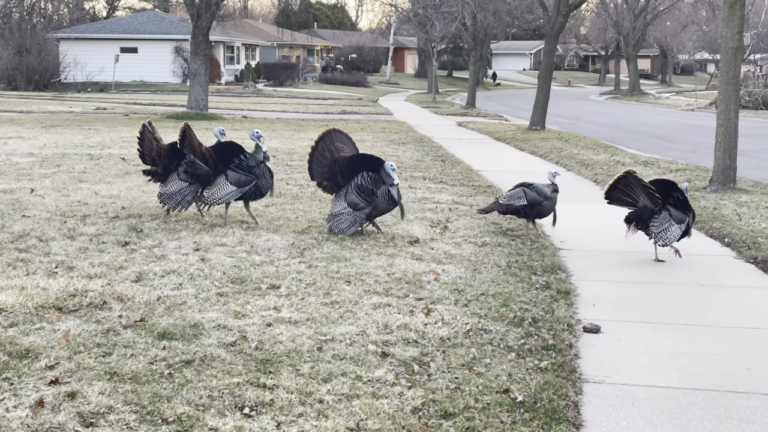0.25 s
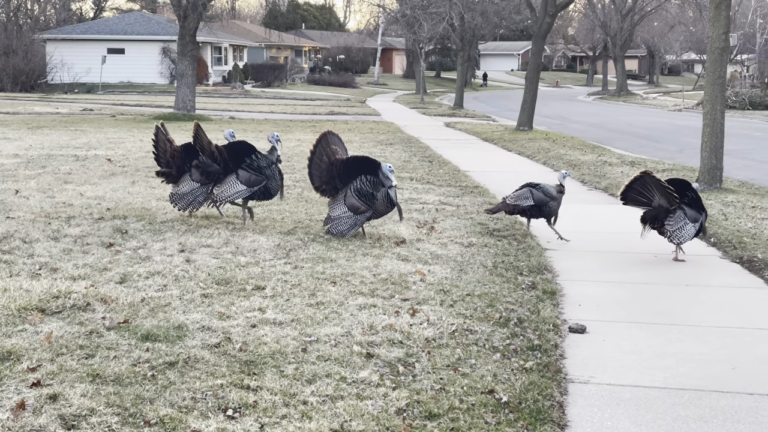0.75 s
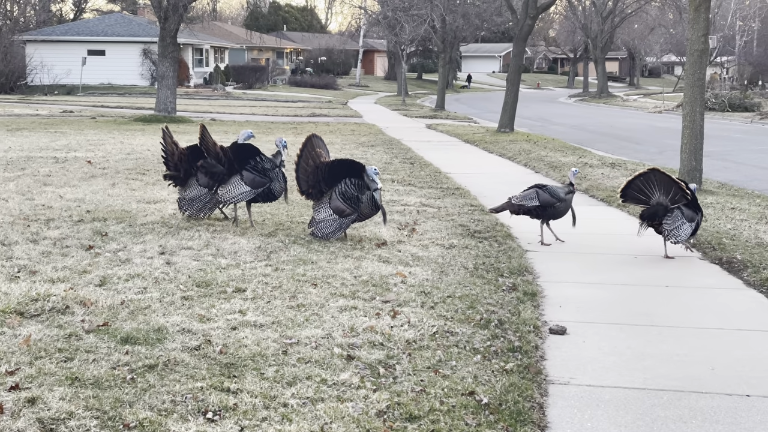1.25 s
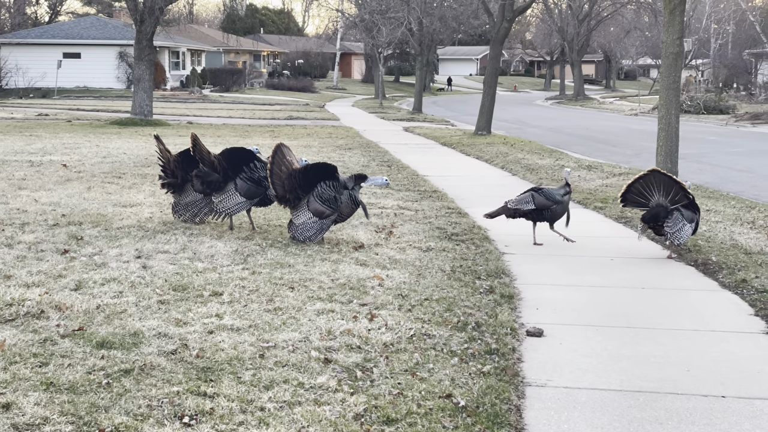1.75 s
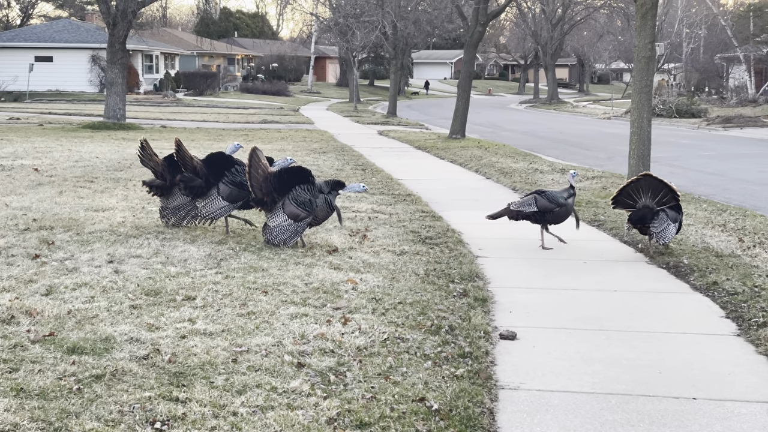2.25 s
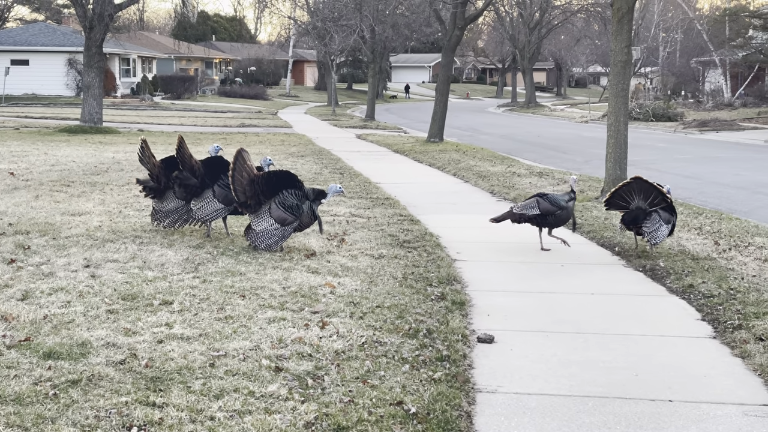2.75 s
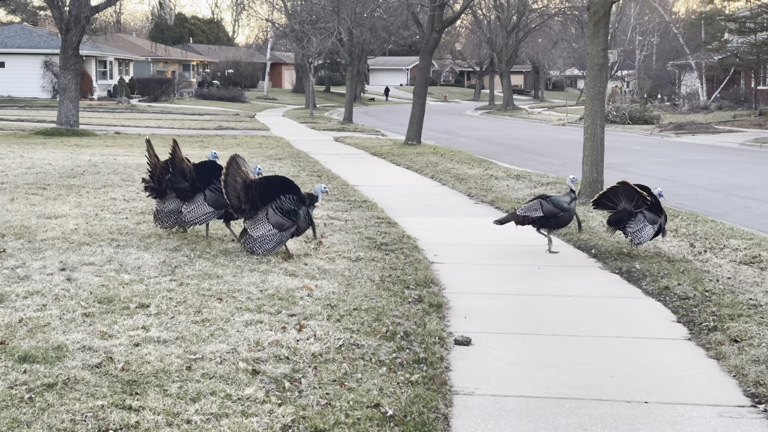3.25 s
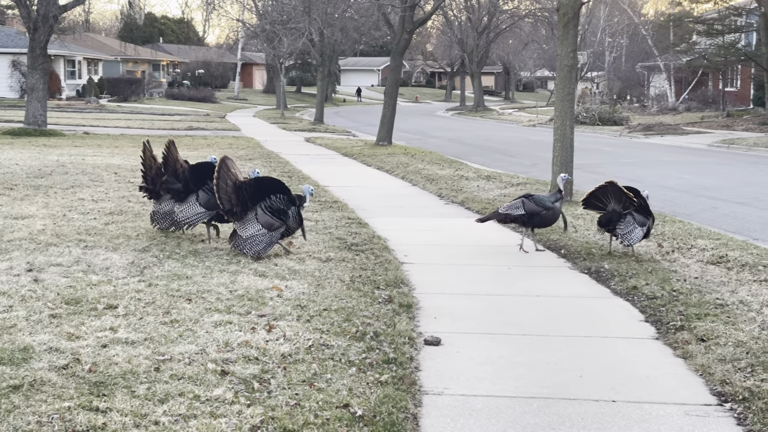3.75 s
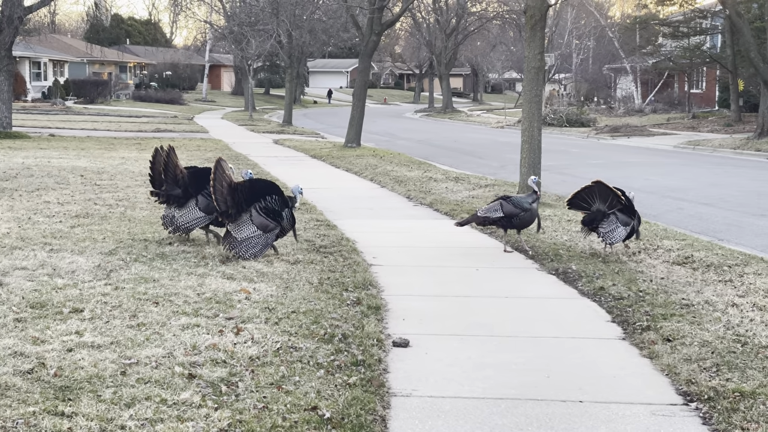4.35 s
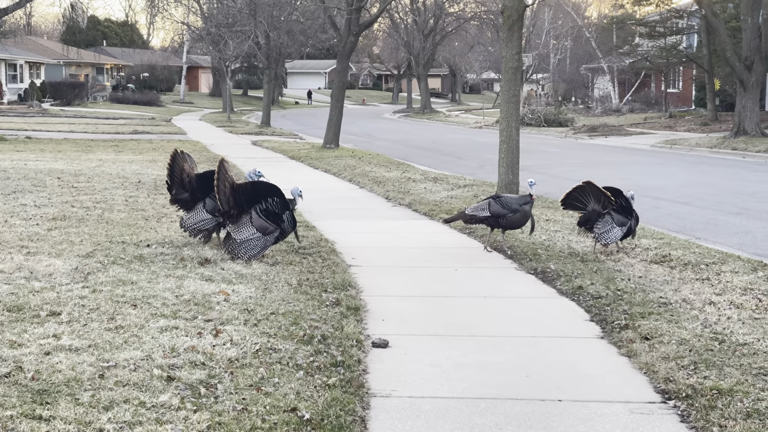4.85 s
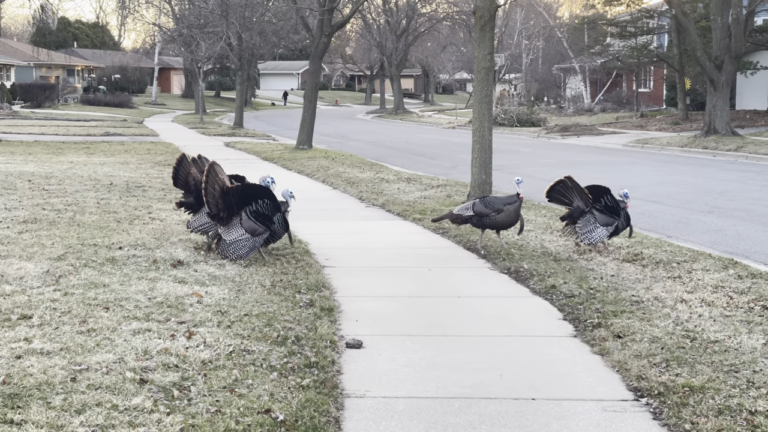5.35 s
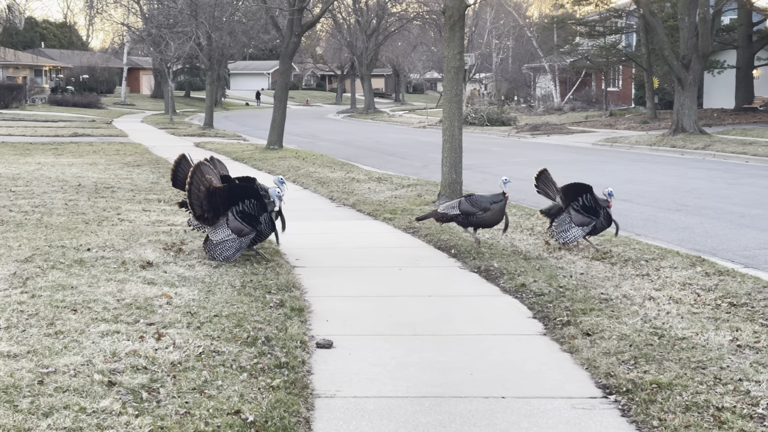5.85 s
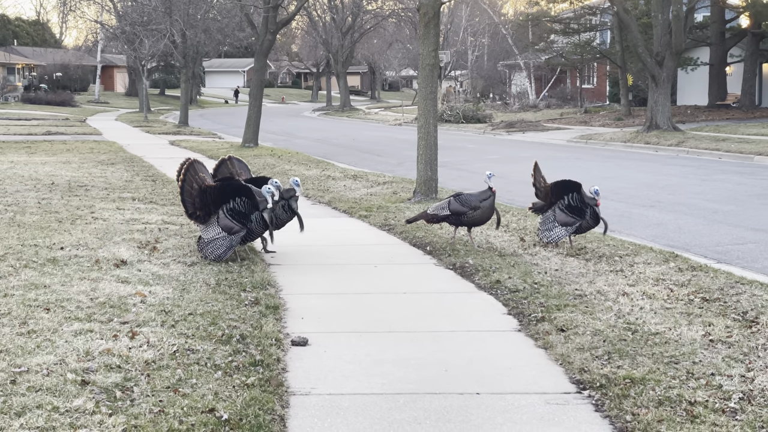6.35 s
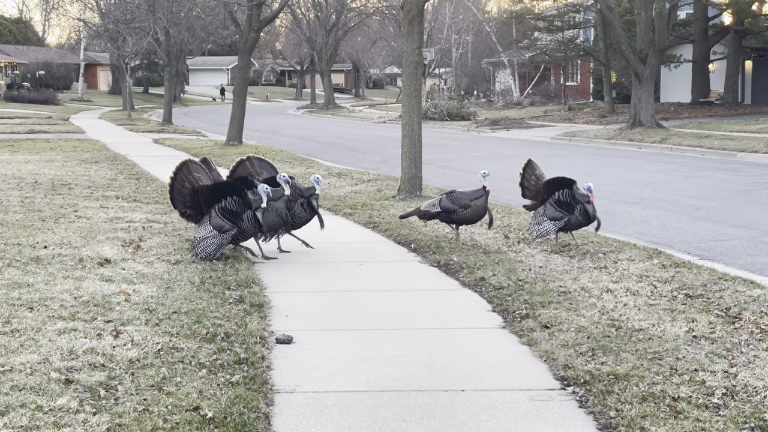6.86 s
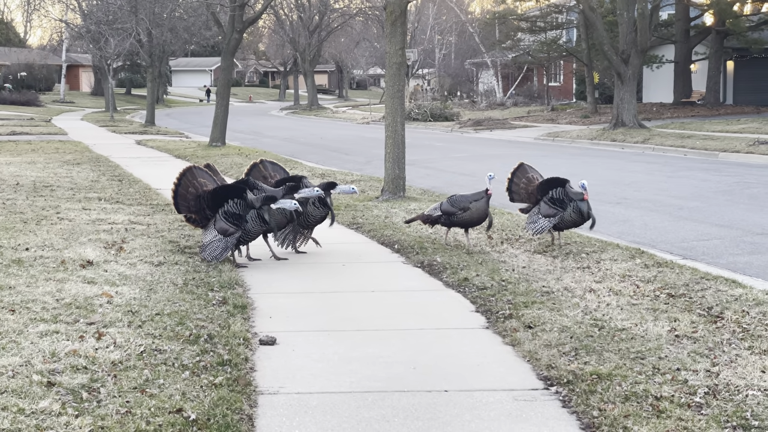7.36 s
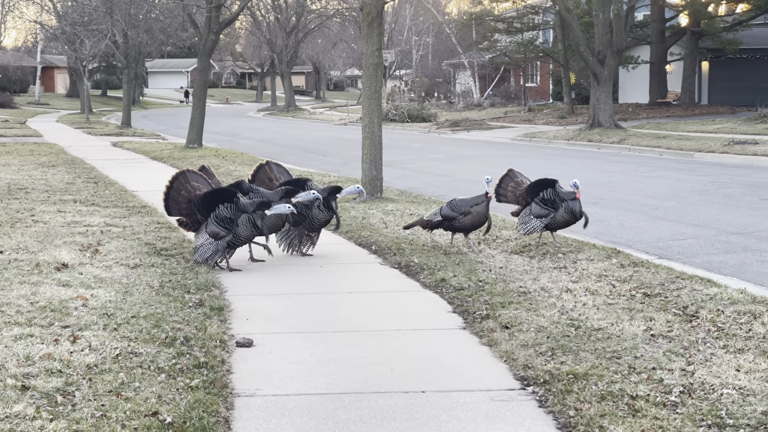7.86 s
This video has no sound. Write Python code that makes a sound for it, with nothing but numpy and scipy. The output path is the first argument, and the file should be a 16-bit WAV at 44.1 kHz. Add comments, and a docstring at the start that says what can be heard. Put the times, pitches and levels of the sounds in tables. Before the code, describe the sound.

Near wild turkeys burst into a loud rattling gobble, a far one answers, birds chirp over soft traffic rumble, then another gobble closes.

```python
"""Turkey toms gobbling on a lawn.

Two gobbles by near wild turkey toms, beside a quiet street; a far tom answers the first.
Gobbles: membrane pulses and breath noise through throat resonances, over low chest tones; clear yelps.
Songbirds: gliding sines. Treble bursts and stalk snaps: shaped noise. Traffic and faint drone: filtered noise.
A scattered echo follows the voices. Two close microphone ports hear it all."""
import sys
import numpy as np
from scipy import signal
from scipy.fft import rfft, irfft, next_fast_len
from scipy.io import wavfile
from scipy.ndimage import uniform_filter1d

SR = 44100
rng = np.random.default_rng(int(sys.argv[2]) if len(sys.argv) > 2 else 0)


def unload_audio(sound):
    """Save the sound as a 16-bit wav file, at the path given as the first command line argument."""
    columns = np.transpose(np.atleast_2d(sound))
    # keep every value between -1 and 1, then stretch to whole-number steps
    steps = np.round(np.clip(columns, -1, 1) * 32767)
    wavfile.write(sys.argv[1], SR, steps.astype(np.int16))


def natural_amplitude(level_db):
    """Convert a level in decibels to a linear amplitude factor, elementwise."""
    exponent = np.asarray(level_db, float) / 20
    return 10 ** exponent


N = 357210

# Traffic spectrum, and side gain on top of it: (frequency [Hz], relative level [dB])
TRAFFIC_SPECTRUM = [(15, -51), (25, -22.5), (39, -7.5), (64, 1), (113, -2.5), (137, -9.5), (161, -5.5),
                    (194, -15.5), (488, -19), (1740, -30.5), (2930, -39.5), (3700, -47), (4270, -50.5),
                    (7000, -68), (9100, -80), (15400, -120)]
TRAFFIC_SIDE_GAIN = [(60, -16.5), (180, -11), (550, 2), (1650, -3), (4970, -24.5), (15000, 3)]
# Traffic swell: (time [s], level [dB])
TRAFFIC_SWELL = [(0, -43), (.7, -41), (1.1, -42.5), (2.1, -39.5), (3.3, -42.3), (5.2, -43.3), (5.9, -41),
                 (6.6, -42.5), (7.2, -39), (8.1, -40)]

# Patchy bursts of high treble noise: (peak time [s], relative peak level [dB], time to fall 20 dB [s])
TREBLE_BURSTS = [(0, -78, .6), (.374, -74, .22), (.64, -73, .04), (.842, -80, .03), (1.084, -89, .07),
                 (2.58, -77, .08), (2.9, -91, .1), (3.03, -85, .06), (3.16, -78, .15), (3.5, -84, .2),
                 (3.6, -77, .22), (3.81, -77, .3), (4.1, -78, .9), (4.65, -78.5, .25), (4.97, -82, .3),
                 (5.14, -79, 1.2), (5.64, -78, .12), (5.76, -79, .09), (5.95, -75, .25), (6.22, -83, .2),
                 (6.53, -82, .35), (6.68, -78, .04), (6.75, -73, .07)]
# Snapping dry stalks: (time [s], relative peak level [dB])
STALK_SNAPS = [(0.0982, -51), (0.3844, -59), (0.5836, -49.5), (0.6517, -48), (0.841, -58), (0.8924, -56),
               (2.8874, -59.5), (3.1562, -63.5), (4.2462, -57), (4.6199, -58), (5.0185, -59),
               (5.5682, -60.5), (6.2013, -52.5), (6.5246, -62), (6.7544, -50)]
# Burst and snap spectrum: (frequency [Hz], gain [dB])
TREBLE_SPECTRUM = [(3000, 6), (5000, -7.5), (8500, 0.5), (13000, 2.5), (16000, -23.5)]
BURST_RISE_20DB_S = 0.04
HISS_FLOOR_REL_DB = -93  # steady faint treble hiss under the bursts

# Faint wavering tones: (frequency [Hz], width per resonance [Hz], relative level [dB])
DRONE_TONES = [(2535, 40, -73.5), (3000, 56, -75.5), (4600, 66, -85)]
# Drone fade: (time [s], gain [dB])
DRONE_GAIN = [(0, -1.5), (1.2, 3.5), (3.0, -1), (5.0, -28), (8.1, -2)]

# Whistles that slide fast, then settle:
# (start [s], length [s], start frequency [Hz], end frequency [Hz], level at start [dB])
WHISTLE_GLIDES = [(.07, .06, 4600, 4060, -78), (.62, .09, 4630, 3900, -75), (2.5, .025, 3800, 3500, -64),
                  (2.84, .03, 3800, 3260, -63), (3.18, .05, 3800, 2600, -65), (3.72, .06, 3300, 2680, -68),
                  (3.7, .28, 2190, 2120, -71), (3.91, .07, 2480, 2280, -67), (4.41, .11, 3500, 3000, -65),
                  (4.52, .1, 3050, 3080, -75), (5.04, .09, 4600, 3650, -69), (5.13, .13, 3480, 3530, -68),
                  (5.11, .09, 3050, 2810, -70), (5.2, .28, 2830, 2850, -77), (5.31, .06, 3400, 2800, -70),
                  (5.55, .18, 3000, 3310, -71), (5.77, .075, 4750, 4660, -70), (5.77, .07, 4980, 5010, -78),
                  (5.77, .07, 4000, 4070, -77), (5.77, .07, 4300, 4350, -69), (5.83, .04, 4300, 3800, -72),
                  (5.87, .075, 3600, 2400, -63), (6.07, .05, 3150, 2600, -69), (6.59, .03, 3280, 3800, -77)]
# Whistles that turn back:
# (start [s], length [s], edge frequency [Hz], middle frequency [Hz], level at start [dB])
WHISTLE_ARCHES = [(.78, .05, 2010, 2150, -63), (.99, .06, 2000, 2140, -65), (3.78, .07, 2750, 3120, -69),
                  (4.6, .04, 2220, 2320, -67), (5.31, .12, 2600, 2350, -70), (6.13, .18, 2250, 3470, -68),
                  (6.385, .115, 3200, 3750, -70)]
WHISTLE_SETTLE_S, WHISTLE_FADE_DB = 0.05, -1.0  # fade: gain over one whistle

# Chest boom, one list per gobble: (time [s], level [dB])
CHEST_THRUM = [
    [(1.1, -44), (1.438, -38), (1.492, -46), (1.556, -32), (1.642, -47), (1.726, -37), (1.766, -46),
     (1.84, -31), (1.942, -45), (1.96, -37), (2.098, -39), (2.128, -31), (2.424, -47), (2.5, -45)],
    [(6.9, -44), (7.062, -44), (7.1, -35), (7.204, -42), (7.234, -34), (7.374, -43), (7.398, -39),
     (7.508, -34), (7.524, -39), (7.698, -44), (7.728, -30), (7.838, -38), (7.882, -34), (8.1, -38)],
]
THRUM_HZ, THROB_SPREAD_DB, THROB_RATE_HZ, THRUM_EDGE_S = 71, 2.0, 14.0, 0.015

# Near toms' notes: (middle [s], length [ms], pitch [Hz], relative voice level [dB], relative rasp level [dB])
NEAR_NOTES = [(1.192, 12, 607, -45, -39), (1.207, 30, 607, -28.5, -45), (1.251, 11, 630, -32, -49),
              (1.271, 37, 625, -26, -41), (1.303, 11, 552, -44, -46), (1.347, 19, 605, -37, -42),
              (1.374, 28, 625, -18, -35), (1.413, 34, 639, -34, -41.5), (1.45, 27, 545, -26, -45),
              (1.495, 30, 602, -17.5, -41.5), (1.542, 38, 588, -28, -41), (1.577, 40, 587, -29, -40),
              (1.611, 26, 600, -39, -46), (1.644, 25, 616, -26, -35.5), (1.685, 54, 599, -27, -43),
              (1.725, 26, 536, -31, -40.5), (1.763, 40, 511, -32, -39.5), (1.799, 30, 558, -37, -43),
              (1.829, 30, 628, -38, -42), (1.853, 16, 567, -31, -40.5), (1.883, 51, 560, -32, -41),
              (1.942, 51, 548, -31, -40), (2.016, 36, 538, -32, -43), (2.045, 32, 550, -34, -44),
              (2.084, 16, 566, -30, -48), (2.106, 33, 575, -28, -38), (2.175, 37, 540, -30, -43),
              (2.205, 26, 522, -36, -43), (2.262, 45, 516, -30, -41), (2.297, 28, 655, -39, -52),
              (2.326, 27, 547, -35, -48), (2.371, 25, 596, -37, -48), (2.41, 24, 575, -51, -58),
              (6.816, 12, 625, -50, -48), (6.966, 11, 630, -33, -50), (6.989, 34, 620, -23, -39),
              (7.034, 31, 585, -30, -38), (7.073, 9, 597, -33, -47), (7.093, 22, 603, -21, -39),
              (7.13, 39, 622, -19, -33), (7.169, 16, 597, -45, -50), (7.21, 43, 557, -28.5, -38),
              (7.261, 25, 586, -26, -34.5), (7.288, 22, 592, -26, -38), (7.309, 19, 554, -24, -32),
              (7.328, 20, 562, -20, -36), (7.346, 18, 562, -37, -53), (7.392, 38, 563, -29, -40),
              (7.419, 22, 499, -27, -36.5), (7.462, 52, 576, -26, -39), (7.496, 28, 546, -30, -33.5),
              (7.517, 17, 488, -32, -42), (7.548, 26, 567, -30, -40), (7.566, 19, 542, -24, -40),
              (7.602, 20, 546, -44, -48), (7.625, 34, 549, -28, -45), (7.663, 36, 511, -27, -35),
              (7.715, 49, 554, -27, -39), (7.774, 24, 545, -29, -43), (7.819, 35, 547, -27, -34.5),
              (7.87, 20, 562, -31, -47), (7.894, 21, 524, -26.5, -37), (7.969, 43, 543, -31, -36.5),
              (8.049, 17, 496, -31, -41.5)]
# Mouth closing down through a gobble: (time [s], mean mouth resonance [Hz],
# base mouth level over pitch [dB], windpipe level over mean of voice and rasp [dB])
THROAT_PATH = [(1.19, 1150, 10, -6), (1.5, 1170, 8, -15), (1.54, 990, 2, -11), (1.68, 960, 7, -8),
               (1.78, 860, 4, -3), (2.1, 800, 12, -3), (2.4, 750, 10, -5), (6.97, 1180, 8, 5),
               (7.14, 1150, 6, -6), (7.21, 1100, -12, -8), (7.27, 930, -9, -2), (7.36, 920, -9, -2),
               (7.52, 850, -2, 0), (8.05, 775, 0.5, -1)]
# Windpipe resonances: (frequency [Hz], width per resonance [Hz], mean relative level [dB])
WINDPIPE_RESONANCES = [(1542, 182, 2), (2071, 180, -4.5)]
# Upper hoarse resonances: (mean frequency [Hz], width per resonance [Hz], base relative level [dB])
RASP_RESONANCES = [(2600, 320, 2), (3050, 204, 2.5), (3358, 210, -2.5), (3800, 300, -2), (4530, 460, -4),
                   (5250, 350, -10), (6310, 990, -11.5), (8260, 1840, -10), (12300, 2200, -16.5)]
LOUD_OPENS_DB_PER_DB = 0.6  # clear notes open wider with loudness
OPEN_SCATTER_DB, MOUTH_SCATTER_RATIO = 1.5, 0.022  # note to note
# Far tom's rattle: (middle [s], relative voice level [dB])
FAR_TOM_NOTES = [(2.445, -51), (2.525, -53), (2.59, -56), (2.665, -55), (2.735, -53), (2.82, -54),
                 (2.885, -54), (2.915, -60), (3.0, -57), (3.065, -57), (3.1, -62)]
# shared by all far notes
FAR_LENGTH_MS, FAR_PITCH_HZ, FAR_MOUTH_MEAN_HZ = 32, 568, 1000
FAR_OPEN_MEAN_DB, FAR_PIPE_DB, FAR_RASP_OVER_VOICE_DB = 12, -1.0, -4.5

# Clear yelps and clucks; rows 2.45-3.02 s are the far tom's ringing third harmonic:
# (middle [s], length [ms], start frequency [Hz], end frequency [Hz], relative level [dB])
CLEAR_NOTES = [(1.199, 24, 1445, 1720, -42), (1.372, 18, 1607, 1700, -28), (1.475, 22, 1458, 1727, -27),
               (2.45, 71, 1750, 1733, -53), (2.6, 50, 1700, 1720, -62), (2.68, 50, 1700, 1710, -60.5),
               (2.76, 50, 1700, 1680, -59.5), (2.871, 60, 1715, 1706, -61), (3.02, 70, 1720, 1753, -54),
               (6.385, 16, 1357, 1350, -44), (6.836, 19, 1795, 1753, -32), (6.912, 26, 490, 507, -37),
               (6.94, 33, 572, 497, -31), (7.032, 30, 1526, 1750, -22), (7.128, 32, 1900, 2050, -25)]
# Clear-note harmonics, before the slope: (frequency [Hz], gain [dB])
CLEAR_SPECTRUM = [(500, -13), (1050, -14), (1330, -2), (1650, 0), (2100, -2), (2500, -4), (2750, -18),
                  (3250, -20), (3520, -5), (3900, -22), (5200, -24), (7200, -42)]
CLEAR_SLOPE_DB_PER_HARMONIC = -2.0

# Port level: (frequency [Hz], left over right [dB])
PORT_LEVEL_DIFFERENCE = [(60, 1.5), (180, 2.0), (550, 4), (1650, 2), (4970, -0.5), (15000, 0.5)]
# Port phase: (frequency [Hz], left lead [rad])
PORT_PHASE_LEAD = [(0, 0), (860, .4), (1550, -.1), (2840, .5), (5000, .7), (6500, -1.1), (8700, -3.1),
                   (13000, -6.1), (16000, -6.3)]


def rms_one(x):
    """Scale to unit rms."""
    return x / np.sqrt(np.mean(x ** 2) + 1e-20)


def at_hz(points, hz):
    """Read a spectrum on a log-frequency axis."""
    point_hz, value = np.array(points).T
    return np.interp(np.log(hz), np.log(point_hz), value)


def drift(rate_hz, size):
    """Random wander of unit rms: noise through two equal one-pole lowpasses."""
    r = np.exp(-2 * np.pi * rate_hz / SR)
    run_in = int(SR / rate_hz)
    noise = rng.standard_normal(size + run_in)
    return rms_one(signal.lfilter([1], [1, -2 * r, r * r], noise)[run_in:])


def resonate(x, hz, width_hz):
    """Two-pole resonance, peak gain about 1."""
    r = np.exp(-np.pi * width_hz / SR)
    poles = [1, -2 * r * np.cos(2 * np.pi * hz / SR), r * r]
    return signal.lfilter([(1 - r * r) / 2, 0, (r * r - 1) / 2], poles, x)


def twice(x, hz, width_hz):
    """Two equal resonances in series, rms 1."""
    return rms_one(resonate(resonate(x, hz, width_hz), hz, width_hz))


def coloured(x, spectrum):
    """Zero-phase filter by a (frequency [Hz], gain [dB]) spectrum."""
    size = next_fast_len(N)
    hz = np.arange(size // 2 + 1) * SR / size + 1  # +1 avoids log(0)
    return irfft(rfft(x, size) * natural_amplitude(at_hz(spectrum, hz)), size)[..., :N]


def level(rows):
    """Gain along a (time [s], level [dB]) curve, -150 dB outside it."""
    time_s, db = np.array(rows).T
    return natural_amplitude(np.interp(np.arange(N) / SR, time_s, db, left=-150, right=-150))


def note_frame(middle_s, length_ms, edge, swell=0.0):
    """Start sample, place (-1..1 over the note) and envelope with steeper onset and optional swell."""
    half = length_ms / 2000 * SR
    place = np.arange(-int(2 * half), int(2 * half)) / half
    steepness = np.where(place < 0, 1.5 * edge, edge)
    envelope = np.exp(-np.abs(place) ** steepness + swell * place)
    return int(middle_s * SR - 2 * half), place, envelope


def add(out, x, start):
    """Mix x in at a sample."""
    out[start:start + len(x)] += x[:N - start]


def traffic():
    """Far tyre and engine noise: shaped noise, independent in middle and side."""
    middle, side = coloured(rng.standard_normal((2, N)), TRAFFIC_SPECTRUM)
    gain = level(TRAFFIC_SWELL) / np.std(middle) * natural_amplitude(0.9 * drift(3.03, N))
    return gain * middle, gain * coloured(side, TRAFFIC_SIDE_GAIN)


def treble_bursts_and_snaps():
    """Patchy bursts of high treble noise, quick rise and mostly slower fall, and single snapping stalks."""
    flicker_db = 2.9 * drift(300.0, N) + 2.0 * drift(25.0, N)
    grains = rng.standard_normal(N) * natural_amplitude(flicker_db)
    t = np.arange(N) / SR
    bursts_db = []
    for peak_s, db, fall_s in TREBLE_BURSTS:
        away = np.where(t < peak_s, (peak_s - t) / BURST_RISE_20DB_S, (t - peak_s) / fall_s)
        bursts_db.append(db - 20 * away)
    burst_db = np.max(bursts_db, axis=0).clip(HISS_FLOOR_REL_DB)
    out = rms_one(grains) * natural_amplitude(burst_db + 5.0)
    decay = np.exp(-np.arange(800) / (0.0017 * SR))
    for snap_s, db in STALK_SNAPS:
        add(out, natural_amplitude(db - 2.5) * rng.standard_normal(800) * decay, int(snap_s * SR))
    return coloured(out, TREBLE_SPECTRUM)


def drone():
    """Thin background tones, noise through narrow resonances, that fade down and return."""
    tones = sum(natural_amplitude(db) * twice(rng.standard_normal(N), hz, width_hz) for hz, width_hz, db in DRONE_TONES)
    return level(DRONE_GAIN) * tones


def slide(t):
    """Path 0 to 1 that settles exponentially."""
    return np.expm1(-t / WHISTLE_SETTLE_S) / np.expm1(-t[-1] / WHISTLE_SETTLE_S)


def turn_back(t):
    """Half-sine path 0 to 1 to 0."""
    return np.sin(np.pi * t / t[-1])


def songbirds():
    """Nearly pure sines gliding along each whistle, fluttering with distance."""
    out = np.zeros(N)
    for rows, path in ((WHISTLE_GLIDES, slide), (WHISTLE_ARCHES, turn_back)):
        for start_s, length_s, from_hz, to_hz, db in rows:
            t = np.arange(int(length_s * SR)) / SR
            hz = from_hz + (to_hz - from_hz) * path(t)
            phase = 2 * np.pi * np.cumsum(hz * (1 + 0.0072 * drift(150.0, len(t)))) / SR
            flutter = natural_amplitude(db + WHISTLE_FADE_DB * t / length_s + 4.2 * drift(40.0, len(t)))
            whistle = np.sqrt(2) * np.sin(phase) * flutter * signal.windows.tukey(len(t), 0.3)
            add(out, whistle, int(start_s * SR))
    return out


def thrum():
    """The air sacs boom and throb at a wavering low tone while the toms gobble."""
    hz = THRUM_HZ * (1 + 0.0791 * drift(7.92, N))
    throb = natural_amplitude(THROB_SPREAD_DB * drift(THROB_RATE_HZ, N))
    boom = np.sqrt(2) * np.sin(2 * np.pi * np.cumsum(hz) / SR)
    swell = uniform_filter1d(sum(level(rows) for rows in CHEST_THRUM), int(THRUM_EDGE_S * SR))
    return boom * throb * swell


def gobble_note(out, note, throat, far):
    """Membrane pulses with breath noise on each opening, through mouth, windpipe and upper resonances."""
    middle_s, length_ms, hz, voice_db, rasp_db = note
    mouth_hz, open_db, pipe_db = throat
    clear = mouth_hz > 1120
    open_db += LOUD_OPENS_DB_PER_DB * (voice_db + 28) * clear + OPEN_SCATTER_DB * rng.normal()
    mouth_hz *= 1 + MOUTH_SCATTER_RATIO * rng.normal()
    # voice power is shared between pitch and mouth
    pitch_db = voice_db - 10 * np.log10(1 + natural_amplitude(2 * open_db))
    mouth_db = pitch_db + open_db
    pipe_db = pipe_db + 0.5 * (voice_db + rasp_db)
    start, place, envelope = note_frame(middle_s, length_ms, edge=2.3, swell=0.4 * clear)
    size = len(place)

    # opening notes clear and swelling, the rattle hoarse, the far tom steady
    if clear:
        arch, jitter, shimmer_db, breath, husk_air, mouth_width_hz = 0.17, 0.02, 2, 0.7, 3, 410
    elif far:
        arch, jitter, shimmer_db, breath, husk_air, mouth_width_hz = 0.03, 0.015, 3, 1.5, 0.8, 250
    else:
        arch, jitter, shimmer_db, breath, husk_air, mouth_width_hz = 0.09, 0.033, 4, 1.3, 1.3, 250
    # pitch arches, falling at the end
    bend = arch * (0.25 - (place + 0.2474) ** 2).clip(-2) + jitter * drift(124.0, size)
    phase = 2 * np.pi * (rng.random() + np.cumsum(hz * (1 + bend)) / SR)
    opening = np.exp(60 * (np.cos(phase) - 1))
    if mouth_hz < 950:
        opening *= 1 + 0.74 * np.cos(phase / 2)  # strong-weak beats give half lines
    pulses = rms_one(opening - opening.mean()) * natural_amplitude(shimmer_db * drift(84.0, size))
    air = rng.standard_normal(size) * (1.3 + np.cos(phase))
    voice = pulses + breath * air
    husk = pulses + husk_air * air  # turbulence in the upper resonances

    # random scatter of resonance levels and frequencies from note to note
    scatter = rng.normal(0, 1, (2, len(RASP_RESONANCES)))
    pipe = np.zeros(size)
    for k, (pipe_hz, width_hz, db) in enumerate(WINDPIPE_RESONANCES):
        pipe += natural_amplitude(db + 3.0 * scatter[0, k]) * twice(voice, pipe_hz * (1.06 if far else 1), width_hz)
    # air dulls the far bird, effort brightens the near ones
    hiss_db = -8.0 if far else 0.75 * (rasp_db + 37) + 6.5 * clear
    rasp = np.zeros(size)
    for k, (rasp_hz, width_hz, db) in enumerate(RASP_RESONANCES):
        gain = natural_amplitude(db + 3.4 * scatter[1, k] + hiss_db * (rasp_hz > 6000))
        rasp += gain * twice(husk, rasp_hz * (1 + 0.03 * scatter[0, k]), width_hz)

    parts = [(twice(voice, hz, 195), pitch_db), (twice(voice, mouth_hz, mouth_width_hz), mouth_db),
             (pipe, pipe_db), (rasp, rasp_db)]
    core = np.abs(place) < 1
    add(out, envelope * sum(natural_amplitude(db + 0.5) * part / np.std(part[core]) for part, db in parts), start)


def gobbles():
    """Rattles of short hoarse notes: the near mouths close down, the far throat has fixed means."""
    near, far = np.zeros((2, N))
    time_s, *throat_curves = np.transpose(THROAT_PATH)
    for note in NEAR_NOTES:
        throat = [np.interp(note[0], time_s, curve) for curve in throat_curves]
        gobble_note(near, note, throat, far=False)
    for middle_s, db in FAR_TOM_NOTES:
        note = middle_s, FAR_LENGTH_MS, FAR_PITCH_HZ, db, db + FAR_RASP_OVER_VOICE_DB
        gobble_note(far, note, (FAR_MOUTH_MEAN_HZ, FAR_OPEN_MEAN_DB, FAR_PIPE_DB), far=True)
    return near, far


def clear_notes(arch=0.0306):
    """Yelps, clucks and the far tom's ringing third harmonic: harmonics that glide and arch, a little husky."""
    out = np.zeros(N)
    for middle_s, length_ms, start_hz, end_hz, db in CLEAR_NOTES:
        start, place, envelope = note_frame(middle_s, length_ms, edge=3.3)
        size = len(place)
        hz = start_hz + (end_hz - start_hz) * (place + 1) / 2
        bend = 1 - arch * place ** 2 + 0.009 * drift(140.0, size)
        phase = 2 * np.pi * np.cumsum(hz * bend) / SR
        tone = np.zeros(size)
        for k in range(1, int(SR / 6 / hz.mean())):
            harmonic_db = at_hz(CLEAR_SPECTRUM, k * hz.mean()) + CLEAR_SLOPE_DB_PER_HARMONIC * (k - 1)
            tone += natural_amplitude(harmonic_db) * np.sin(k * phase)
        shimmer = natural_amplitude(2 * drift(60.0, size))
        husk = 1 + 0.048 * rng.standard_normal(size)
        add(out, natural_amplitude(db) * envelope * tone * shimmer * husk, start)
    return out


def street(x, t60_s=0.56, echo_db=-18.5, cut_hz=3500):
    """Houses and trees scatter back a late dull noise tail, different in middle and side."""
    t = np.arange(int(0.7 * SR)) / SR
    build_up = (t / 0.06).clip(0, 1) ** 2
    tail = rng.standard_normal((2, len(t))) * natural_amplitude(-60 * t / t60_s) * build_up
    tail = signal.lfilter(*signal.butter(1, cut_hz, fs=SR), tail)
    tail /= np.sqrt(np.sum(tail[0] ** 2))
    return natural_amplitude(echo_db) * signal.fftconvolve(x[None], tail)[:, :N]


def scene():
    """Middle and side of everything, as left and right."""
    road, road_side = traffic()
    treble, tones, birds, chest = treble_bursts_and_snaps(), drone(), songbirds(), thrum()
    toms, far_tom = gobbles()
    near, far = toms + clear_notes(), far_tom + birds
    echo, echo_side = street(near + natural_amplitude(7.0) * far)  # far voices come mostly scattered
    middle = near + far + chest + treble + road + tones + echo
    side = road_side * natural_amplitude(-2.5) + echo_side * natural_amplitude(-4.0)
    return np.array([middle + side, middle - side])


def low_pass(x):
    """Removes everything above the highest recorded frequency."""
    return signal.sosfilt(signal.butter(12, 15720, fs=SR, output="sos"), x)


def record(dry):
    """Deep bass is cut; the ports differ in level and phase, nearly opposed around 9 kHz."""
    dry = signal.sosfilt(signal.butter(3, 38.0, "high", fs=SR, output="sos"), dry)
    size = next_fast_len(N)
    hz = np.arange(size // 2 + 1) * SR / size + 1
    lead_rad = np.interp(hz, *np.transpose(PORT_PHASE_LEAD))
    # each port takes half the difference
    half = natural_amplitude(at_hz(PORT_LEVEL_DIFFERENCE, hz) / 2) * np.exp(0.5j * lead_rad)
    ported = irfft(rfft(dry, size) * np.array([half, 1 / half]), size)[:, :N]
    return low_pass(ported)


dry = scene()
out = record(dry)
unload_audio(out)
```